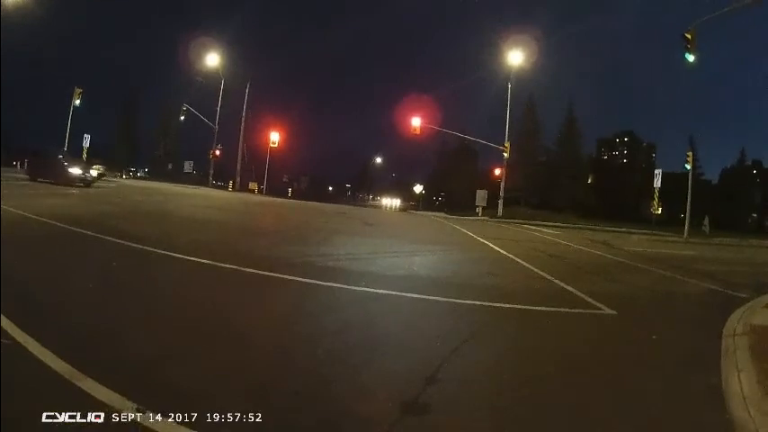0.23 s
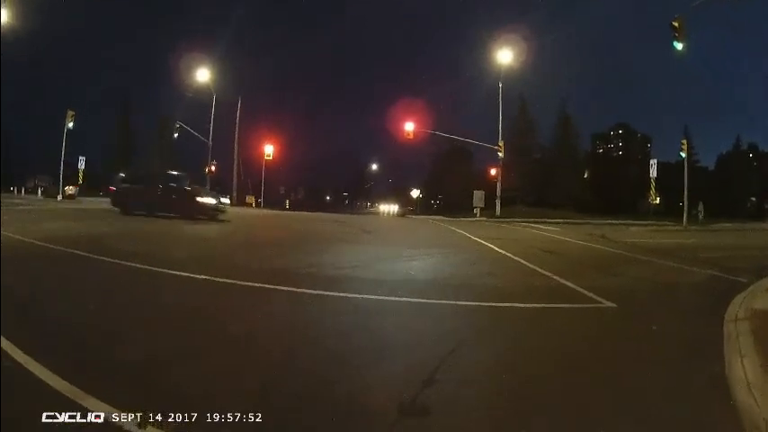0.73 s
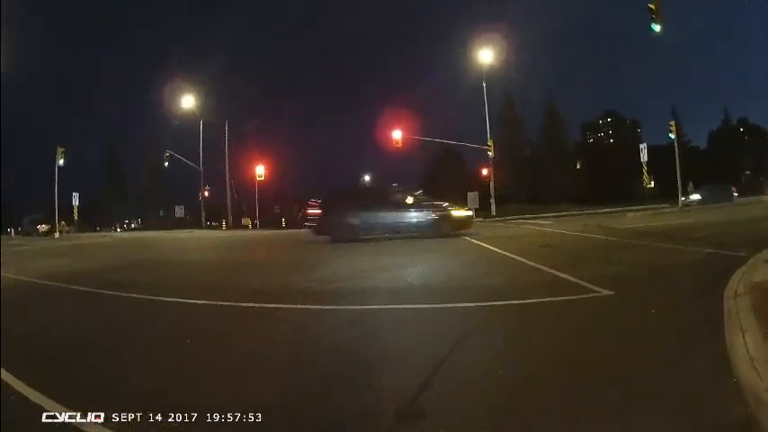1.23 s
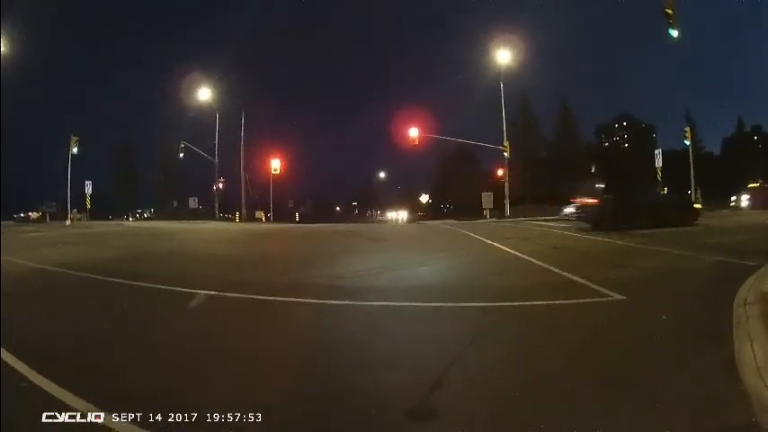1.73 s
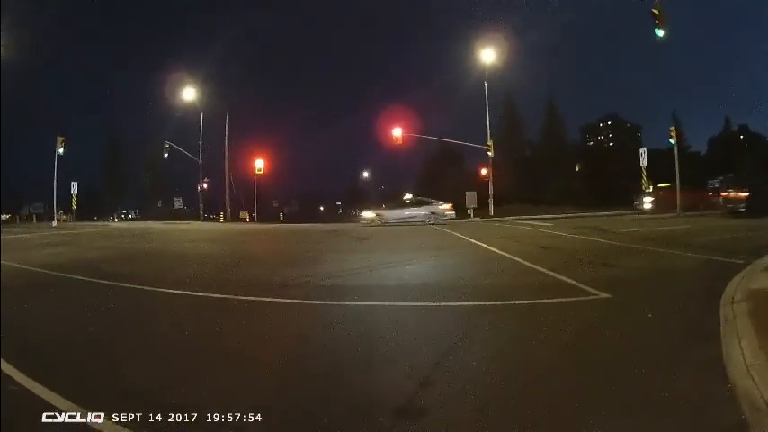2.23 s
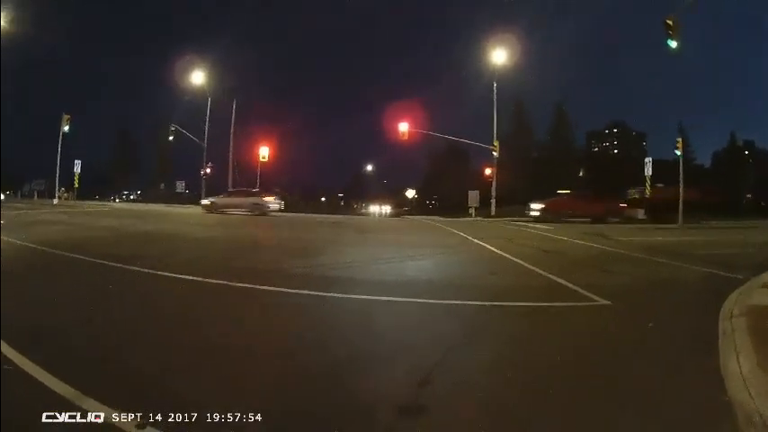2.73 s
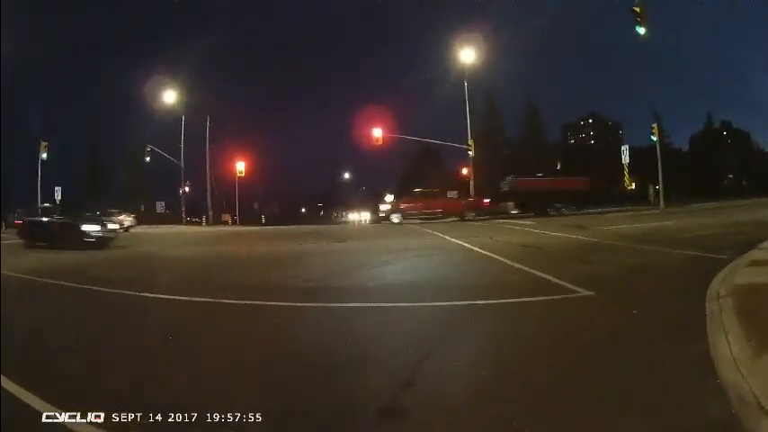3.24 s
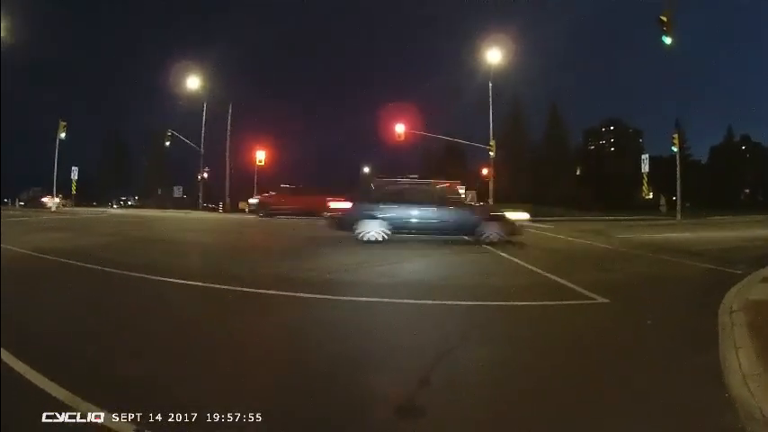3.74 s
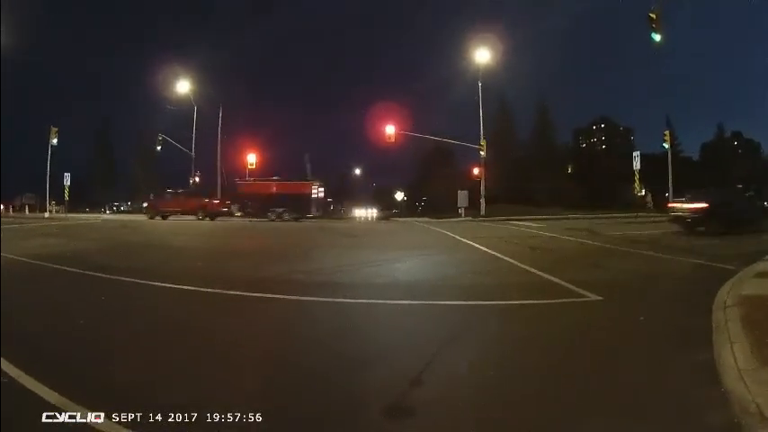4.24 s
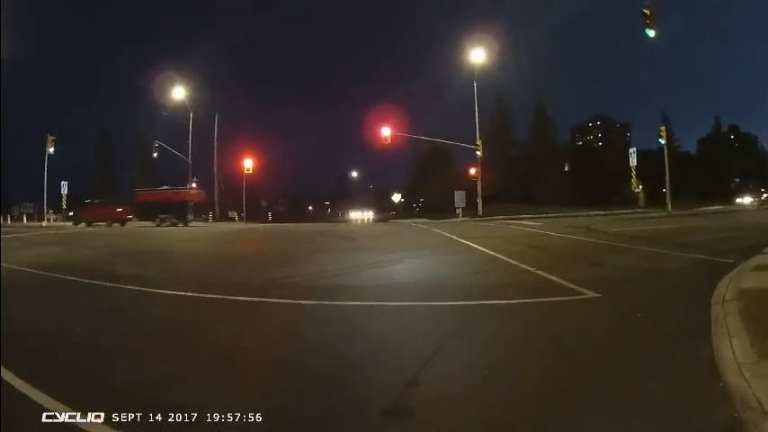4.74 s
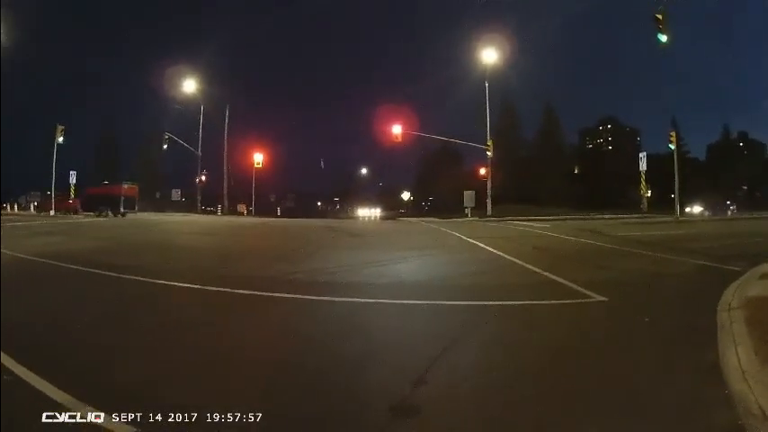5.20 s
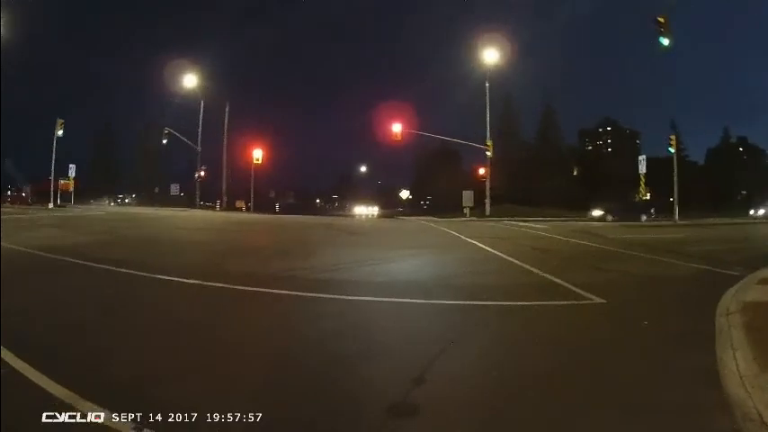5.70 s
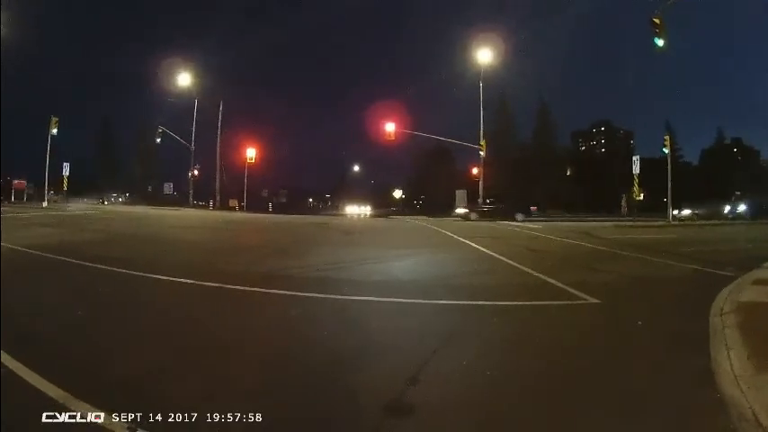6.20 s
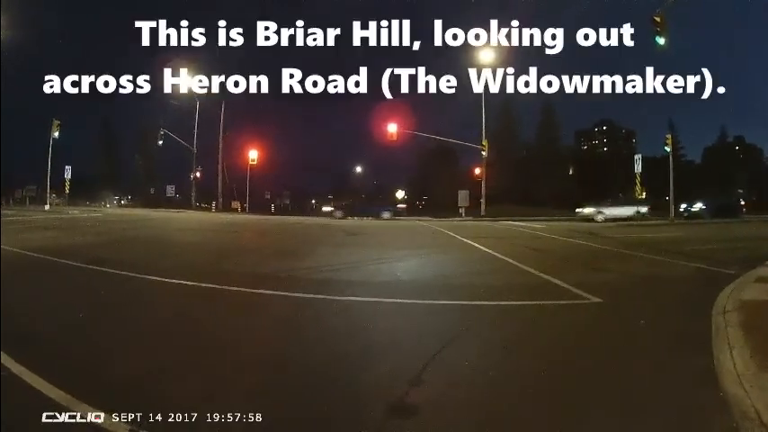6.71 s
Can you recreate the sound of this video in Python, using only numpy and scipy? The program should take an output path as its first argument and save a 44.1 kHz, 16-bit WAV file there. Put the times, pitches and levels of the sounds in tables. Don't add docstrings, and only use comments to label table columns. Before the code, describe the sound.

At a wide road crossing at dusk, heard through a small housed bicycle camera microphone, faint traffic rumble and hiss fade in. A quick car sweeps by, its tyre roar growing and engine pitch sinking. A pickup with a trailer drones across the far lanes, axles knocking in pairs over seams, while a second car passes. The wash then eases slightly and continues.

```python
import sys
import numpy as np
from scipy import signal
from scipy.fft import rfft, irfft, next_fast_len
from scipy.io import wavfile
from scipy.ndimage import uniform_filter1d, map_coordinates

SR = 44100
rng = np.random.default_rng(int(sys.argv[2]) if len(sys.argv) > 2 else 0)


def dump_mix(stems):
    frames = np.atleast_2d(stems).T
    limited = np.clip(frames, -1, 1)
    pcm = np.round(limited * 32767).astype(np.int16)
    wavfile.write(sys.argv[1], SR, pcm)


def decibels_to_gain(level_db):
    exponent = np.asarray(level_db, float) / 20
    return 10 ** exponent


N = 306936


def unit(x):
    return x / np.sqrt(np.mean(x ** 2) + 1e-20)


def curves(rows):
    s, *columns = np.transpose(rows)
    return [np.interp(np.arange(N) / SR, s, column) for column in columns]


def wobble(rate, order=3, span=slice(None)):
    knots = rng.standard_normal(int(N * rate / SR) + 4)
    return map_coordinates(knots, [np.arange(N)[span] * rate / SR], order=order)


def rush(spectrum, patchy_db):
    z = signal.stft(rng.standard_normal(N), nperseg=512)[2]
    patches = uniform_filter1d(rng.standard_normal(z.shape), size=5, axis=0)
    patches = uniform_filter1d(patches, size=30, axis=1)
    white = signal.istft(z * decibels_to_gain(patchy_db * unit(patches)), nperseg=512)[1][:N]
    m = next_fast_len(N + 8192)
    hz, db = np.transpose(spectrum)
    log_hz = np.log(np.fft.rfftfreq(m, 1 / SR) + 1)
    colour = decibels_to_gain(np.interp(log_hz, np.log(hz + 1), db, -120, -120))
    return unit(irfft(rfft(white, m) * colour, m)[:N])


SWELL_DB = 15.5


def passing(s, half_s, hz, glide, db):
    span = slice(max(round((s - 2 * half_s) * SR), 0), round((s + 2 * half_s) * SR))
    t = np.arange(N)[span] / SR - s
    return span, hz * (1 + glide * t), db - SWELL_DB * (t / half_s) ** 2


# pitch_hz, level_db (per Hz)
SELF_NOISE = [(3200, -4.5), (5500, -4), (8300, -5), (13000, -5), (14000, -5), (15500, -4), (17000, -39)]
HISS_DB, FADE_FROM_DB, FADE_S = -66, -14, 4.3


def hiss():
    opening_db = FADE_FROM_DB * np.clip(1 - np.arange(N) / (FADE_S * SR), 0, 1) ** 1.45
    return decibels_to_gain(HISS_DB + opening_db + 0.47 * wobble(9.2)) * rush(SELF_NOISE, patchy_db=1.4)


# pitch_hz, level_db (per Hz)
RUMBLE_COLOUR = [(5, -29), (11, -4), (22, 2.5), (38, -1), (50, 2.5), (86, -3.5), (110, -7), (140, -22),
                 (240, -120)]
# pitch_hz, level_db (per Hz)
DRONE_COLOUR = [(47, -8), (80, -8.5), (151, 0), (229, 0), (280, -3), (325, -4.5), (404, -9.5), (453, -10),
                (560, -18.5), (730, -19.5), (1230, -120)]
# time_s, level_db
ENGINE_EFFORT = [(0, -50.5), (.6, -43.5), (1.1, -40.5), (1.66, -36), (2.2, -32.5), (2.9, -30.5), (3.5, -29),
                 (4.15, -30.5), (4.4, -28.5), (4.57, -31), (4.7, -30.5), (5.21, -29.5), (5.9, -34),
                 (6.05, -32.5), (6.75, -34), (6.96, -33)]
# middle_s, half_length_s, level_db (over the rumble, negative dips)
RUMBLE_SURGES = [(.5, 0.28, 0), (2.05, 0.12, 5.5), (2.303, 0.085, 2), (2.453, .06, 5), (2.75, .2, -2),
                 (3.15, 0.21, 2), (3.45, 0.18, 4), (4.1, 0.23, 9), (4.3, 0.13, -1.5), (4.705, 0.11, -5),
                 (5.148, 0.37, 3.5), (5.6, 0.11, -1), (5.7, 0.41, 3), (6.5, 0.18, -3)]
DRONE_DB, RUMBLE_DB, RUMBLE_GROWS = -0.5, -4.5, 0.45


def rumble_and_drone(swell):
    effort_db, = curves(ENGINE_EFFORT)
    t = np.arange(N) / SR
    surge_db = sum(db * np.exp(-((t - s) / half_s) ** 2) for s, half_s, db in RUMBLE_SURGES)
    usual_db = effort_db.mean()
    rumble_db = usual_db + RUMBLE_GROWS * (effort_db - usual_db) + surge_db + RUMBLE_DB
    drone_db = effort_db + DRONE_DB + 0.28 * swell + 0.21 * wobble(6.5)
    rumble = decibels_to_gain(rumble_db) * rush(RUMBLE_COLOUR, patchy_db=2.0)
    return rumble + decibels_to_gain(drone_db) * rush(DRONE_COLOUR, patchy_db=-0.23)


# loudest_s, half_length_s, pitch_hz, glide_per_s (share), level_db
ENGINE_ORDERS = [(2.7, 1.37, 126.5, -.037, -42.5), (4.6, 0.71, 115.6, -0.0051, -42),
                 (3.4, 1.2, 151.5, -0.0405, -40), (5.8, .9, 143.5, -.03, -56), (3, 1.38, 50.5, -0.02, -53),
                 (5.7, 0.475, 28, -0.039, -49), (0.42, 0.88, 219, 0.008, -52.5),
                 (0.41, .6, 271, -0.028, -58.5), (1.265, 0.306, 248, -.03, -42.5),
                 (0.878, 0.51, 245, -.02, -49), (1.55, .3, 212, -.08, -41), (1.97, 0.186, 120, -.03, -41),
                 (3.6, 0.151, 140, -0.034, -38.5), (0.66, 0.21, 100, 0.013, -52),
                 (1.39, 0.235, 407, -0.016, -53), (4.05, 0.2016, 148, -.03, -35),
                 (1.1, 0.46, 87, -0.0377, -48.5), (2.3, 0.453, 241, -.02, -42),
                 (4.12, 0.199, 222.3, -0.02, -33.5), (6.85, .25, 145, -0.036, -46),
                 (3.9, 0.303, 105, -0.034, -39.5)]


def engines():
    out = np.zeros(N)
    for row in ENGINE_ORDERS:
        span, hz, db = passing(*row)
        unsteady_hz = hz * (1 + 0.0205 * wobble(14, order=1, span=span))
        phase = 2 * np.pi * np.cumsum(unsteady_hz) / SR
        level = decibels_to_gain(db + 2.75 * wobble(11, order=1, span=span))
        out[span] += np.sqrt(2) * level * np.sin(phase)
    return out


# loudest_s, half_length_s, centre_hz, glide_per_s (share), level_db air
LOW_HUMS = [(0.695, 1.2, 236.7, -.01, -48), (1.6, .6, 218.3, -.15, -39.5),
            (2.153, .45, 196.8, -0.1103, -36.5), (6.197, 0.299, 110.3, -0.011, -34),
            (6.451, 0.6, 56.3, -.012, -35.5), (3.153, 0.205, 75.5, -.02, -37)]
GROOVE_HUMS = [(.95, .4, 1000, 0.052, -54), (1.6, .5, 1120, 0.054, -47), (3.55, .5, 1035, -0.038, -37.5),
               (4.15, .4, 1030, 0.078, -32), (4.55, .2, 1086, .02, -39), (4.8, .25, 1059, .2, -37),
               (5.75, .6, 1142, 0.013, -40.5), (6.8, .9, 1152, 0.053, -39)]
TREAD_HUMS = [(0.64, 0.249, 580, -0.078, -54.5), (.9, 0.415, 890, -.02, -52.5), (2.4, .9, 930, -.02, -43),
              (2.8, 0.77, 740, -.06, -45), (3.75, 0.397, 3400, .02, -61), (3.1, .45, 1880, .01, -49.5),
              (3.35, .5, 3620, .01, -68), (4.2, .3, 3200, -0.0031, -59.5), (6.6, .3, 430, -0.13, -42.5),
              (3.4, .45, 625, -0.24, -48), (0.78, 1.5, 2220, -.07, -72.5), (1.1, 0.64, 3150, -.14, -71.5),
              (2, .4, 2780, -0.041, -64), (1.9, .8, 3930, .07, -71), (4.5, .8, 1560, .05, -41.5),
              (4.8, .3, 1350, .05, -40), (.95, .4, 1550, .05, -57), (6.85, .3, 2800, 0.043, -59),
              (4.85, .25, 3050, .01, -59), (6, 0.59, 2200, -.03, -57.5), (5.8, 1.302, 1750, .01, -48.5),
              (4.9, .9, 3430, .08, -61), (5.9, 0.73, 3760, .11, -63.5), (4.75, .7, 4400, .08, -65)]
BRAKE_SQUEAL = [
    (5.4, .6, 13150, .001, -77),
]


def songs():
    out = np.zeros(N)
    for width, rows in [(.17, LOW_HUMS), (.2, GROOVE_HUMS), (.21, TREAD_HUMS), (.03, BRAKE_SQUEAL)]:
        for row in rows:
            span, hz, db = passing(*row)
            phase = 2 * np.pi * np.cumsum(hz) / SR
            width_hz = width * row[2]
            in_phase = wobble(width_hz, order=1, span=span) * np.cos(phase)
            quadrature = wobble(width_hz, order=1, span=span) * np.sin(phase)
            out[span] += decibels_to_gain(db) * (in_phase + quadrature)
    return out


# start_s, level_db (peak), thud_db, slap_hz
SEAM_KNOCKS = [(.52, -32.5, -10, 605), (.69, -34, 1, 560), (3.36, -21, 0, 603), (3.46, -20, -3, 562),
               (3.937, -13.5, -7.5, 680), (4.069, -16, -1.5, 755), (4.405, -14.5, -1, 437),
               (4.539, -20, 5, 924), (4.745, -24, 2, 700), (4.88, -24, -3, 680), (5.279, -22, -3, 505),
               (5.409, -18.5, -3, 564), (6.019, -22, 0, 1040), (6.178, -27, -7, 1076)]


def ring(t, hz, t60):
    return decibels_to_gain(-60 * t / t60) * np.sin(2 * np.pi * hz * t)


def seams():
    out, t = np.zeros(N + SR), np.arange(SR // 8) / SR
    dull = signal.butter(4, 1700, fs=SR, output="sos")
    rise = 1 - np.exp(-t / 0.0029)
    for s, db, thud_db, hz in SEAM_KNOCKS:
        slap = ring(t, hz, 0.07) + 0.42 * ring(t, 0.81 * hz, 0.068)
        slap += 0.3 * ring(t, 1.17 * hz, 0.059) + 0.65 * ring(t, 1310, 0.018)
        thud = decibels_to_gain(thud_db + 4.0) * (ring(t, 210.7, 0.08) + 0.77 * ring(t, 320, 0.08))
        scuff = unit(signal.sosfilt(dull, rng.standard_normal(len(t)))) * decibels_to_gain(-60 * t / 0.047)
        out[round(s * SR):][:len(t)] += decibels_to_gain(db - 5.5) * rise * (slap + thud + 0.5 * scuff)
    return out[:N]


# pass_s, pace_per_s (speed over nearest distance), bounce_ms (delay when nearest),
# level_db (over the far traffic)
NEAR_CARS = [
    (1.75, 0.84, 0.81, 6),
    (3.95, 0.74, 0.9, 4),
    (6.0, 0.64, 0.9, 1.5),
]


def tyres(spectrum, bounce):
    n = np.arange(N)
    total, power = rush(spectrum, patchy_db=-3.0), 1
    for s, pace, delay_ms, db in NEAR_CARS:
        distance = np.sqrt(1 + (pace * (n / SR - s)) ** 2)
        near = decibels_to_gain(db) / distance ** 1.02
        tread = rush(spectrum, patchy_db=1.7)
        echo = np.interp(n - delay_ms / 1000 * SR / distance, n, tread)
        total = total + near * (tread + bounce * echo) / np.sqrt(1 + bounce ** 2)
        power = power + near ** 2
    return total / np.sqrt(power)


# pitch_hz, level_db (per Hz)
ROAR_COLOUR = [(250, -33), (420, -5.5), (453, -4), (543, -5), (654, -2), (834, -4.5), (978, -1),
               (1080, -1.5), (1860, -11), (2200, -27.5), (2860, -34.5), (4840, -120)]
# pitch_hz, level_db (per Hz)
SIZZLE_COLOUR = [(1180, -17), (2000, -1), (2150, -4.5), (2740, -5.5), (3040, -7), (3340, -14), (4390, -17),
                 (4980, -22.5), (7000, -28.5), (9100, -35), (15400, -120)]
# time_s, level_db, sizzle_db (higher when near)
TYRE_STRENGTH = [(0, -51, -21), (.25, -50, -21), (.75, -48.5, -19.5), (1.4, -44, -20), (1.9, -39.5, -20.5),
                 (2.3, -36.5, -19.5), (2.9, -34.5, -18), (3.15, -36.5, -14), (3.4, -33, -18),
                 (3.7, -33.5, -16), (4.07, -34, -18), (4.2, -33.5, -16), (4.82, -33, -18.5),
                 (5.05, -34.5, -19), (5.4, -36.5, -19), (6.1, -36, -19), (6.96, -36.5, -16.5)]
ROAR_DB, SIZZLE_DB = 0, 0.36


def rolling(swell):
    roll_db, near_db = curves(TYRE_STRENGTH)
    roar = decibels_to_gain(roll_db + ROAR_DB + 0.54 * swell) * tyres(ROAR_COLOUR, bounce=0.56)
    sizzle_db = roll_db + near_db + SIZZLE_DB + 0.55 * wobble(7.6)
    return roar + decibels_to_gain(sizzle_db) * rush(SIZZLE_COLOUR, patchy_db=1.04)


def scene():
    swell = wobble(4.13)
    return (rumble_and_drone(swell) + engines() + songs() + seams() + rolling(swell))[None]


# pitch_hz, level_db (against the sound around it)
WEAKEST_KEPT = [(1800, -15), (3000, -10), (5000, -6.5), (7000, -3.5), (9000, -2), (11000, -1), (13300, 0),
                (13700, 2.2), (14500, 3)]
# time_s, level_db (higher drops more)
STRICTNESS = [(0, -3), (1.2, 1.7), (2, -2.5), (2.6, .9), (3.3, 1.5), (4.3, 0.5), (5.2, -1.5), (6.96, -1)]
# time_s, edge_hz, scatter_hz
TREBLE_EDGE = [(0, 14300, 100), (.4, 13900, 250), (.55, 13500, 50), (1.9, 13450, 100), (2.1, 13350, 500),
               (2.4, 13250, 350), (3.4, 13000, 357), (3.55, 13550, 80), (4.6, 13550, 60),
               (4.75, 13800, 450), (5.3, 14100, 500), (5.8, 14900, 250), (6.05, 14700, 400),
               (6.25, 13600, 150), (6.45, 14500, 450), (6.96, 14300, 400)]


def masked(x):
    half, lead = 1024, 10
    n, k = np.arange(2 * half), np.arange(half)
    window = np.sin(np.pi * (n + .5) / (2 * half))
    basis = window[:, None] * np.cos(np.pi / half * np.outer(n + .5 + half / 2, k + .5))
    blocks = np.pad(x[0], (half + lead, 2 * half - (N + lead) % half)).reshape(-1, half)
    lines = np.hstack([blocks[:-1], blocks[1:]]) @ basis
    hz, t = (k + .5) * SR / (2 * half), np.arange(len(lines)) * half / SR
    surroundings = uniform_filter1d(uniform_filter1d(lines ** 2, size=21, axis=1), size=7, axis=0)
    clump = uniform_filter1d(lines ** 2, size=3, axis=1)
    strict_db = np.interp(hz, *np.transpose(WEAKEST_KEPT))
    strict_db = strict_db + np.interp(t, *np.transpose(STRICTNESS))[:, None]
    strict_db = strict_db + 0.33 * rng.standard_normal((len(t), 1))
    s, top_hz, scatter_hz = np.transpose(TREBLE_EDGE)
    edge_hz = np.interp(t, s, top_hz) + np.interp(t, s, scatter_hz) * rng.standard_normal(len(t))
    strong = clump > surroundings * decibels_to_gain(2 * strict_db) * (hz > 1800)
    kept = lines * strong * (hz < edge_hz[:, None])
    frames = kept @ basis.T * 2 / half
    return (frames[1:, :half] + frames[:-1, half:]).ravel()[None, lead:lead + N]


def top_cut(x):
    return signal.sosfilt(signal.butter(12, 15080, fs=SR, output="sos"), x)


def record(dry):
    fade = np.clip((N - np.arange(N)) / (.004 * SR), 0, 1)
    mix = masked(fade * (dry + hiss()))
    return top_cut(mix)


dry = scene()
out = record(dry)
dump_mix(out)
```